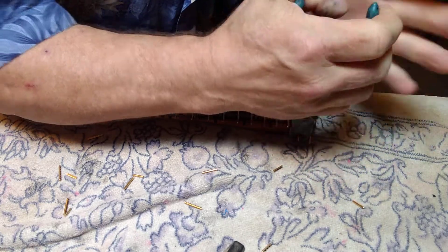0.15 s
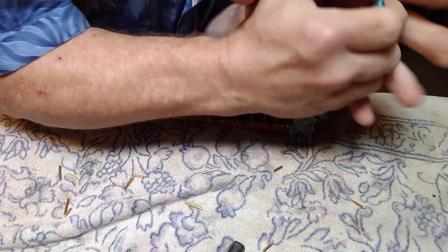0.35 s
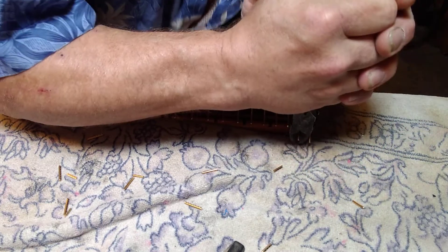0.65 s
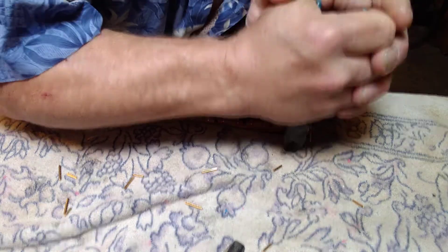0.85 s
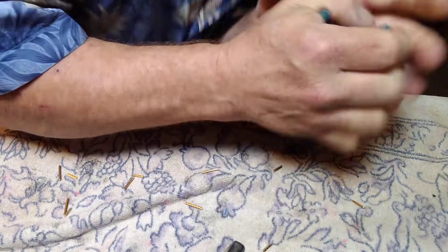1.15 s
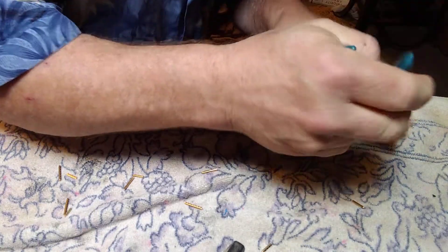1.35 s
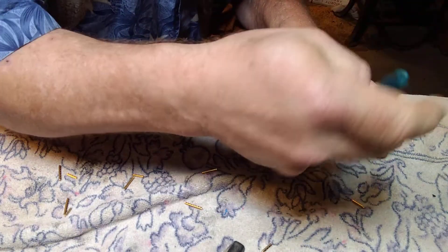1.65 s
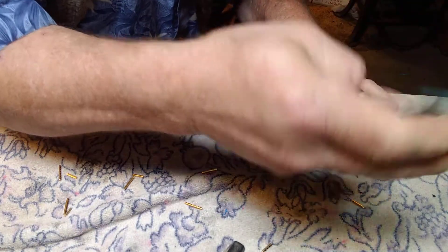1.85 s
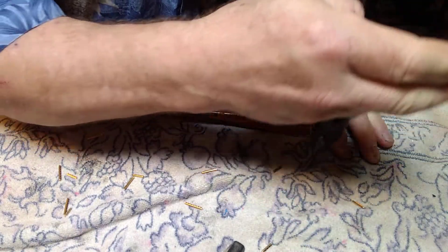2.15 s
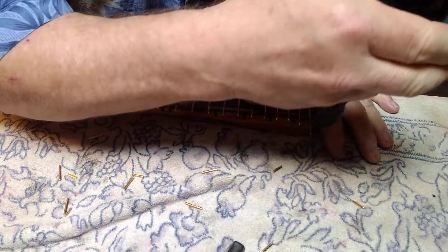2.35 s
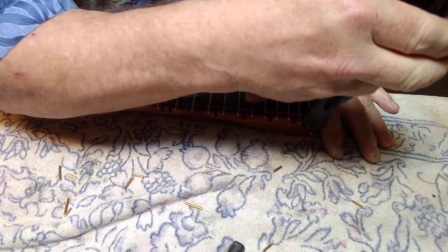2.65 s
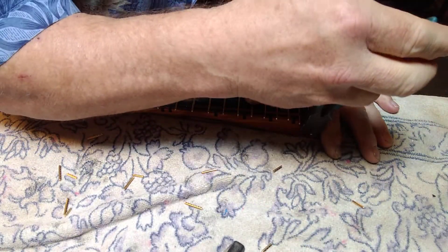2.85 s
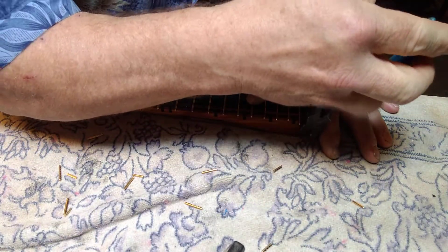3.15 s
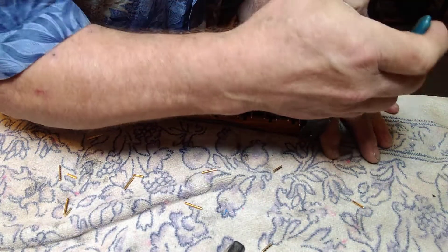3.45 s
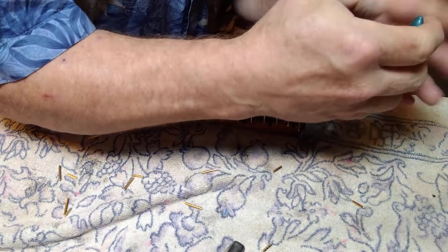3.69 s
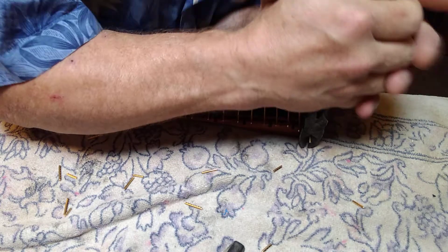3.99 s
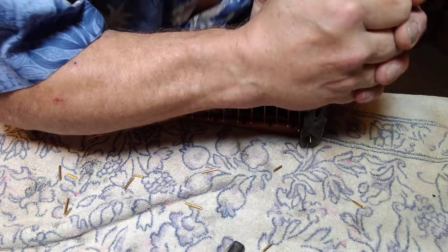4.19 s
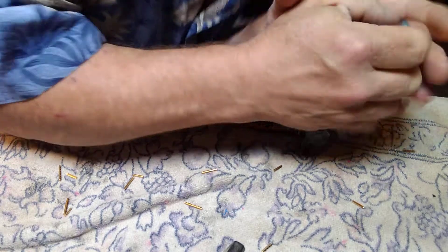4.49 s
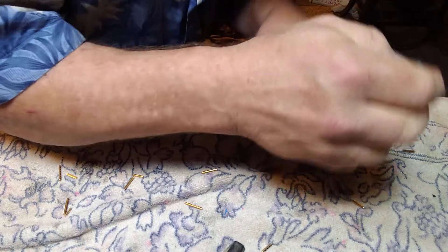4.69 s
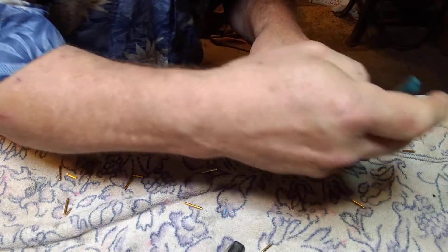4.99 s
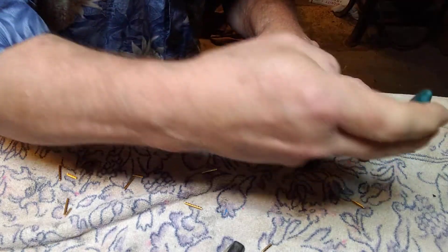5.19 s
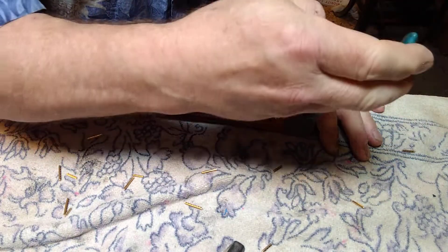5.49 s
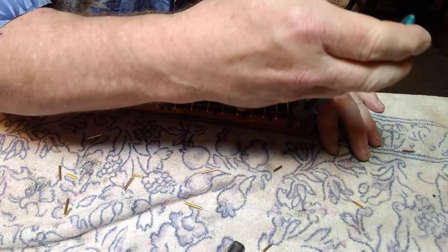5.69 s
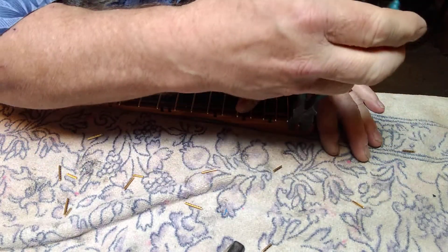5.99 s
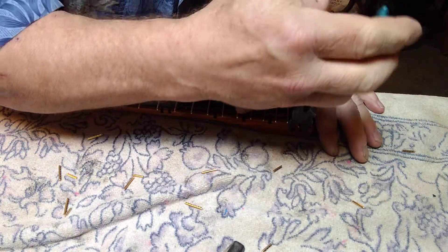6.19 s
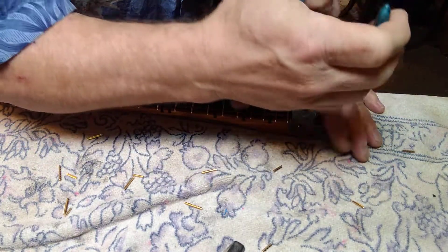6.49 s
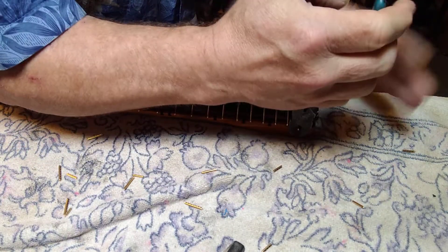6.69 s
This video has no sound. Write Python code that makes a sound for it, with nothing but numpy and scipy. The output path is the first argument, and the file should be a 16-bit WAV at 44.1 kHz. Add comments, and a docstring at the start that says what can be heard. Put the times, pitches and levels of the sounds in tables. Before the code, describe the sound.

A sharp metallic snap sounds up close as cutters bite off a wire end, which strikes nearby and lands with a light, tinny clatter. Small handling ticks and a soft wooden knock fill the pause. A second loud snap comes about three seconds after the first, jolting the microphone, and its offcut also bounces and rings briefly. Faint hum and hiss fill the small workshop.

```python
"""Cutting fret wire in a small workshop

End cutters snap through hard wire twice, close to a camera's stereo microphones. Each cut end
flies off, ticks, skitters and lands in something tinny further away; the jolt shakes the camera
mount. Behind the bench, a fan and mains hum beat softly over the room hiss."""
import sys
import numpy as np
from scipy import signal
from scipy.fft import rfft, irfft
from scipy.io import wavfile
from scipy.ndimage import uniform_filter1d

SR = 44100
rng = np.random.default_rng(int(sys.argv[2]) if len(sys.argv) > 2 else 0)


def to_wav(sig):
    """Store sig (one row per channel, or 1-D mono) as 16-bit WAV at the path in sys.argv[1].

    Samples outside -1..1 are clipped; the rate is SR.
    """
    pcm = np.clip(np.atleast_2d(sig), -1, 1) * 32767
    pcm = np.round(pcm).astype(np.int16)
    wavfile.write(sys.argv[1], SR, pcm.T)  # frames by channels


N = 301543

# Balance is left minus right; a send is the feed to the room, relative to the source's level.
# Sharp cracks: the wire snaps and its end strikes nearby; later a faint crack and the second snap.
# t/s, level/dB, balance/dB, t60/s, send/dB, relative blow/dB, air push/dB, steel ring/dB, spectrum index
SNAPS = [(0.7897, 8, 4.5, 0.011, -1, -12.5, -24.5, -25, 0), (0.8741, -1.5, 11, 0.015, -2, -16, -28, -42, 1),
         (4.1827, -25, 5.5, .03, -19, -9, -45, -61, 2),
         (4.1863, 2.5, 5.5, 0.021, -3.5, -14, -19.5, -20.5, 2)]
CRACK_SPECTRA = [
    [(88, -37.5), (150, 0.5), (275, -15.5), (348, -9.5), (624, -23.5), (716, -33.5), (1900, -14.5),
     (3490, -14), (4580, -4.5), (6770, -14.5), (8400, -3), (12400, -5.5), (14800, -8.5), (16000, -9)],
    [(88, -24), (150, -13.5), (649, -15), (2180, -22.5), (3920, -42.5), (4240, -49), (5250, -12.5),
     (7620, -21.5), (9440, -18.5), (10200, -1), (11000, 3.5), (16000, -18)],
    [(88, -28.5), (150, 0), (270, -8), (566, -7.5), (774, -22.5), (837, -20), (1900, -12.5), (2600, -11.5),
     (3620, -14.5), (4760, -2.5), (6510, -13), (7320, -6), (11700, -4.5), (16000, -9)],
]  # three colours of crack: f/Hz, relative density/dB
STEEL_MODES = [(4180, 230, -5.5), (4670, 400, 0), (5180, 300, -2), (5900, 350, -4)]  # the cutters' ring: f/Hz, width/Hz, relative level/dB
BITES = [(0.254, -61, 8900), (0.268, -54, 15300), (0.3595, -66, 10100), (0.3884, -65, 11600),
         (1.6783, -68.5, 10700), (3.6701, -67.5, 13900), (3.8631, -64, 9720), (3.8752, -65, 9560),
         (3.902, -56.5, 9820), (3.9209, -63.5, 12350), (3.935, -63.5, 5270), (3.9433, -59, 5380),
         (3.9577, -62, 5300), (3.9934, -64, 5340), (4.0122, -60.5, 6950), (4.029, -59.5, 12370),
         (4.0732, -60.5, 12200), (4.1153, -60, 12100), (6.5538, -68.5, 14280)]  # the jaws slip on the wire: t/s, level/dB, favoured f/Hz
JAW_MODES = [(5350, 76.5), (7100, 100), (8800, 100), (9750, 190), (10900, 200), (11600, 330), (12200, 290),
             (13300, 177), (14100, 208), (15200, 490)]  # resonances of the jaws: f/Hz, width/Hz
KNOCKS = [(2.612, -53, 4.5), (4.198, -30.5, -1), (5.601, -54.5, 4.5)]  # cutters set against the wooden neck: t/s, level/dB, balance/dB
NECK_MODES = [(223, -19, 0.13), (629, 5.5, 0.067), (978, -3, 0.04), (1435, -5.5, 0.03), (2550, -19, 0.058)]  # resonances of the neck: f/Hz, relative level/dB, t60/s
# Harder bounces in the tin, a list per landing: t/s, low ring/dB, then relative to the low ring
# middle/dB, chime/dB, treble/dB
BOUNCES = [
    [(1.418, -59.5, -5.5, -42.5, -2.5), (1.433, -39.5, -10, -44, -8), (1.465, -35, -11.5, -47, -13.5),
     (1.575, -58, -10, -40, -19), (1.635, -65, 2, -34, -20), (1.75, -61.5, -14, -30, -22)],
    [(4.797, -48, -11, -15, -2), (4.809, -37.5, -15, -35, -9), (4.824, -30.5, -13.5, -40, -12.5),
     (4.86, -50, -11, -11, -4), (4.91, -48, -10, -7, -9.5), (4.97, -51, -0.5, -1, -10),
     (5.06, -70, 7, 17, 4.5), (5.11, -64.5, 4.5, 5, -0.5)],
]
# Resonances of the tin: f/Hz, width/Hz, weight in first landing/dB, weight in second/dB
TIN_MODES = [(561, 143, -17, -21.5), (679, 73, -3.5, -7), (829, 37, -3, -5.5), (873, 63, 4.5, 5.5),
             (942, 27, -3.5, 1), (1288, 64, 7, 4), (1653, 23, -8, -13.5), (1770, 34, -19, -15),
             (1964, 200, -6.5, -9), (2347, 180, 0, -3.5), (2369, 35, -5, -10.5), (3038, 124, -29, -9),
             (3746, 150, -3.5, 0), (4360, 270, 4, 3), (4655, 250, 1.5, 0), (6220, 100, -9, -6),
             (6600, 350, -12, -6.5), (7650, 530, -6, -7), (8230, 570, -3.5, -5), (9000, 160, -2.5, -17),
             (9380, 460, -34, -1.5), (10680, 580, -27, 1), (11370, 460, -12, 5.5), (12200, 400, -12, -27),
             (13100, 550, -13, -8), (13900, 400, -17, -14)]
SKITTERS = [(1.075, -57.5, 0.14), (1.125, -63, .02), (4.453, -55, 0.055), (4.49, -62, .006)]  # a cut end skitters: loudest t/s, level/dB, swell/s
SKITTER_SPECTRUM = [(2350, -48), (4000, -93), (6550, -29), (7310, -19.5), (9440, -7), (10200, -15),
                    (11800, 1.5), (14500, -11.5), (16000, -26)]  # its hiss: f/Hz, relative density/dB
TICKS = [(1.4181, -48, 11700, 11, 4.5), (1.4621, -44, 11700, 18, 0), (1.4625, -49, 14270, 18, -6),
         (2.2576, -47.5, 12480, 20, -4), (2.612, -44.5, 12800, 10.5, -6.5), (2.258, -61, 9030, 14, -9.5),
         (2.613, -58.5, 8900, 9, -4.5), (2.6865, -49, 4970, -10.5, -4), (2.688, -65, 4350, -7, 8),
         (4.4303, -54, 11700, 11, -4), (4.485, -48, 11900, 20, -19.5), (4.4855, -52.5, 9260, 19, -17),
         (4.8012, -45, 10740, 9, 4), (4.8, -58, 14580, 11, -8), (6.2613, -45, 12800, 23, 1),
         (6.262, -58.5, 9930, 11.5, -4.5)]  # wire ends and jaws tick: t/s, level/dB, f/Hz, balance/dB, send/dB
TAPS = [(0.184, -60.5, 220, 19, 0), (0.185, -59, 718, 7, 0), (0.208, -57, 226, 13, 3.5),
        (0.212, -54.5, 722, 12, 0), (0.252, -62.5, 228, 24, -1.5), (0.252, -56, 776, 9, -3),
        (0.332, -63, 814.4, 8, -5), (0.399, -64, 725.2, 11, -2), (0.623, -62, 220, 12, -2.5),
        (0.612, -65, 1410, 6, -10), (1.561, -48, 353, -4, -1.5), (1.771, -57, 378, -18, -6.5),
        (1.859, -53.5, 360.6, -2.5, -3), (1.999, -60, 450.4, -4.5, -4), (2.65, -56.5, 230, 12, 7),
        (2.682, -56, 221.7, 8, 3), (2.729, -61.5, 362, -15, -9), (2.77, -61, 328.6, -10, -4),
        (3.278, -63.5, 421.4, -9, 2.5), (4.081, -60, 804, 7, -12.5), (5.091, -63.5, 455, 24, -9),
        (5.299, -62, 1297, 2.5, -3), (5.403, -63.5, 541, -12, -2.5), (5.462, -54, 784.6, -6.5, -9),
        (5.79, -63.5, 800, -9, -9), (5.971, -64, 638.4, 9.5, -7), (6.115, -49.5, 824, 5, -6),
        (6.228, -64, 402.6, -11.5, -4.5), (6.34, -66.5, 439.3, -12, 2)]  # dull taps about the bench: t/s, level/dB, f/Hz, balance/dB, send/dB
SQUEAKS = [(0.001, .065, 9270, -66), (.025, .022, 9900, -70), (0.066, .035, 9800, -65),
           (0.111, .04, 9500, -75), (0.427, .07, 9650, -67), (0.558, .045, 9400, -71),
           (0.607, .06, 9450, -71), (5.09, .1, 10900, -69)]  # thin squeaks, perhaps the hinge: t/s, length/s, f/Hz, level/dB
SHUDDERS = [
    [(0.782, -34.5, 18), (0.82, -32.5, 2), (0.862, -38.5, 5), (0.998, -39.5, 8), (1.064, -51, 16),
     (1.098, -41.5, 15), (1.136, -66.5, 16), (1.204, -56, 15), (1.25, -72.5, 10)],
    [(4.178, -32, 36.5), (4.198, -32.5, 20), (4.254, -50.5, 21), (4.318, -45, 26.5), (4.36, -48, 29),
     (4.4, -31.5, 1), (4.538, -58.5, 9), (4.62, -64, 9), (4.75, -70.5, 6)],
]  # the mount shakes, a curve per cut: t/s, level/dB, balance/dB
JOLTS = [(0.781, -55, -34.5, -34.5), (.87, -42.5, -46, -45), (4.178, -39.5, -40.5, -55),
         (4.385, -53, -42, -40), (4.699, -71, -68, -61)]  # loose parts shaken: t/s, overtone/dB, rumble/dB, sway/dB
FAN_ORDERS = [(1, -92, 0), (3, -77, -1), (5, -92, -1), (6, -81, 0)]  # shaft harmonics: order, rms level/dB, balance/dB
FAN_WHINES = [(62.3, 1.8, -79, 3.5), (400, 4.6, -94, -5.5), (458, 6.5, -89, -6), (542.2, 17, -88, 1.5),
              (804, 18, -89, 2), (2177, 5.8, -84.5, -14.5)]  # fuzzy fan tones: f/Hz, width/Hz, rms level/dB, balance/dB
ROOM_DECAY = [(150, 0.24), (400, 0.15), (1040, 0.24), (2760, 0.2), (5000, 0.15), (9000, 0.1), (15000, 0.14)]  # the workshop's early tail: f/Hz, t60/s
ROOM_COLOUR = [(100, -6.5), (400, -1.5), (1200, 1), (3000, -4), (5000, -2), (6800, 3), (9000, 3),
               (14000, -1)]  # tone of the tail: f/Hz, relative level/dB
HISS_SPECTRUM = [(12, -53), (20, -34.5), (63, -8), (86, -12), (111, 2.5), (143, -19.5), (224, -14),
                 (243, -21.5), (351, -16.5), (439, -20), (1080, -23.5), (2180, -21.5), (2960, -30.5),
                 (14300, -32.5), (16400, -48)]  # room tone: f/Hz, relative density/dB
MIC_LIKENESS = [(60, 0.45), (130, 0.93), (290, 0.82), (640, 0.6), (1410, -0.3), (3100, 0.41), (6820, -0.41),
                (15000, 0.094)]  # diffuse sound at the two microphones: f/Hz, correlation
MIC_BALANCE = [(60, 0.5), (180, 1.5), (550, 0.5), (1650, 0.5), (4970, -2), (15000, 8.5)]  # shading between the microphones: f/Hz, balance/dB


def snaps(dry, blow_hz=1700, blow_t60=.0097):
    """Close up, each snap or strike gives a crack and a blunt blow, and sets off its own room tail."""
    shading = pan(0.98, read(MIC_BALANCE, np.fft.rfftfreq(4096, 1 / SR)))
    lead = 128  # samples ahead of the click that excites the room
    for s, db, side_db, t60, send_db, blow_db, *_, kind in SNAPS:
        spectrum = CRACK_SPECTRA[round(kind)]
        crack = amp(db) * unit_rms(colour(rng.standard_normal((2, 4096)), spectrum))
        crack = pan(0.95, side_db)[:, None] * irfft(rfft(crack) * shading)
        blow = amp(db + blow_db) * unit_rms(resonate(rng.standard_normal(4096), blow_hz, width=2000))
        add(dry, s, crack * burst(t60) + blow * burst(blow_t60))
        click = colour(signal.unit_impulse(4096, lead), spectrum)
        strength = amp(db + send_db) * np.linalg.norm(burst(t60)) / np.linalg.norm(click)
        add(dry, s - lead / SR, room(strength * click))


def recoil(dry, push_s=.00095, push_lag_s=.002):
    """Each crack pushes the air once, near the left microphone, and leaves the steel ringing raggedly."""
    u = np.arange(1000) / SR / push_s
    push = np.e * u * (2 - u) * np.exp(-u)
    t = np.arange(SR // 4) / SR
    for s, *_, push_db, ring_db, _ in SNAPS:
        add(dry, s + push_lag_s, pan(amp(push_db) * push, 9.5))
        noise = rng.standard_normal((2, len(t))) * flicker(len(t), depth_db=2.2, span=130)
        ring = sum(amp(db) * mode(noise, hz, width) for hz, width, db in STEEL_MODES)
        add(dry, s, unit_rms(ring) * struck(t, [(0.012, ring_db)], rise=0.012, t60=.17))


def bites(dry, wet, others_db=-11, db_per_octave=-14, scrape_db=-10, send_db=-4, side_db=10):
    """Each slip scrapes and rings the jaws, favouring the mode nearest its pitch."""
    for s, db, hz in BITES:
        noise = rng.standard_normal((2, 4096))
        scatter_db = 5.5 * rng.standard_normal(len(JAW_MODES))
        mode_hz = np.transpose(JAW_MODES)[0]
        mode_db = others_db + db_per_octave * abs(np.log2(mode_hz / hz)) + scatter_db
        mode_db[np.argmin(abs(mode_hz - hz))] = 0
        ring = sum(gain * mode(noise, f, width) for gain, (f, width) in zip(amp(mode_db), JAW_MODES))
        scrape = unit_rms(np.diff(noise, prepend=0)) * burst(t60=0.032, rise=0.00031)
        bite = amp(db) * (ring * burst(t60=0.028, rise=0.0022) + amp(scrape_db) * scrape)
        add(dry, s, pan(1, side_db)[:, None] * bite)
        add(wet, s, amp(send_db) * bite[0])


def knocks(dry, wet, send_db=-4.5):
    """The cutters touch the neck and ring its damped wooden modes."""
    t = np.arange(8000) / SR
    body = sum(amp(db - 60 * t / t60) * np.sin(2 * np.pi * hz * t) for hz, db, t60 in NECK_MODES)
    for s, db, side_db in KNOCKS:
        add(dry, s, pan(amp(db) * body, side_db))
        add(wet, s, amp(db + send_db) * body)


def tin(dry, rattle_s=.55, left_lag_s=.00045):
    """Further off to the right, bounces and echoes too dense to count drive the modes of the tin."""
    for landing, rows in enumerate(BOUNCES):
        times, low_db, middle_db, chime_db, treble_db = np.transpose(rows)
        t = np.arange(times[0], times[0] + rattle_s, 1 / SR)
        noise = rng.standard_normal((5, len(t)))
        alike, apart = noise[0] + noise[1:3], noise[3:]  # half shared by the microphones; unshared
        # drive, from f/Hz, to f/Hz, level/dB, rise/s, t60/s
        bands = [(alike, 0, 1100, low_db, .0017, .36),
                 (alike, 1100, 2800, low_db + middle_db, .0017, .49),
                 (alike, 2800, 3300, low_db + chime_db, .02, .36),
                 (apart, 3300, SR, low_db + treble_db, .01, .27)]
        sound = 0
        for drive, lo, hi, levels, rise, t60 in bands:
            ring = sum(amp(db[landing]) * mode(drive, hz, width)
                       for hz, width, *db in TIN_MODES if lo <= hz < hi)
            sound += steadied(ring) * struck(t, zip(times, levels), rise, t60)
        add(dry[0], times[0] + left_lag_s, sound[0])
        add(dry[1], times[0], sound[1])


def skitters(dry, swell_db=16, fade_db_per_s=324, tail_s=.17, side_db=21.7):
    """Tiny bounces of a cut end, well to the left, merge into a grainy hiss that swells and fades."""
    for s, db, swell_s in SKITTERS:
        t = np.arange(-swell_s, tail_s, 1 / SR)
        arch_db = np.minimum(swell_db * t / swell_s, -fade_db_per_s * t)
        level = signal.windows.tukey(len(t), .05) * amp(db + arch_db)
        grains = rng.standard_normal((2, len(t))) * flicker(len(t), depth_db=1.6, span=90)
        add(dry, s - swell_s, pan(level, side_db) * unit_rms(colour(grains, SKITTER_SPECTRUM)))


def contacts(dry, wet, rows, width, rise, t60):
    """A tick or tap at the bench: noise rings one broad resonance; width maps pitch to Hz per stage."""
    for s, db, hz, side_db, send_db in rows:
        ring = rng.standard_normal((2, 4096))
        for widening in (1, 1, 2):
            ring = resonate(ring, hz, widening * width(hz))
        ping = amp(db) * unit_rms(ring) * burst(t60, rise)
        add(dry, s, pan(1, side_db)[:, None] * ping)
        add(wet, s, amp(send_db) * ping[0])


def squeaks(dry, sag_db=-6):
    """A narrow, unsteady whistle with a weaker one just below; it starts softly and its level sags."""
    for s, length, hz, db in SQUEAKS:
        t = np.arange(0, length, 1 / SR)
        level = signal.windows.tukey(len(t), .13) * amp(db + sag_db * t / length)
        noise = rng.standard_normal((2, len(t)))
        whistle = resonate(noise, hz, width=80) + 0.22 * resonate(noise, 0.95 * hz, width=90)
        add(dry, s, level * unit_rms(whistle))


def shudders(dry, start_hz=101.1, glide_hz_per_s=30):
    """A low shudder fades, gliding up toward the hum's pitch; its phase drifts at each microphone."""
    for rows in SHUDDERS:
        times, levels, balances = np.transpose(rows)
        t = np.arange(times[0], times[-1], 1 / SR)
        level = pan(amp(np.interp(t, times, levels)), np.interp(t, times, balances))
        hz = start_hz + glide_hz_per_s * (t - times[0])
        drift = 0.059 * np.cumsum(uniform_filter1d(rng.standard_normal((2, len(t))), 900), 1)
        tone = np.sqrt(2) * np.sin(2 * np.pi * np.cumsum(hz) / SR + drift)
        add(dry, times[0], signal.windows.tukey(len(t), .05) * level * tone)


def jolts(dry):
    """Each jolt shakes loose parts, leaving an overtone, a rumble and a slow sway dying away."""
    t = np.arange(SR // 2) / SR
    parts = (204, 37, .8), (60, 25, .45), (22, 18, .4)  # f/Hz, width/Hz, t60/s
    for s, *levels in JOLTS:
        noise = rng.standard_normal((3, len(t)))
        drive = (noise[0] + 1.1 * noise[1:]) * pan(1, 3)[:, None]
        for (hz, width, t60), db in zip(parts, levels):
            add(dry, s, mode(drive, hz, width) * struck(t, [(0.0042, db)], rise=0.015, t60=t60))


def fan_and_mains(shaft_hz=36.33, mains_hz=119.935, mains_db=-74, in_phase_s=2.012):
    """Behind the bench, mains hum beats against a fan's third shaft order; fuzzy fan tones waver."""
    t = np.arange(N) / SR - in_phase_s
    fan = sum(pan(amp(db) * np.cos(2 * np.pi * order * shaft_hz * t), side_db)
              for order, db, side_db in FAN_ORDERS)
    mains = amp(mains_db) * np.cos(2 * np.pi * mains_hz * t)
    noise = rng.standard_normal(N) * flicker(N, depth_db=3.4, span=1500)
    whines = sum(pan(amp(db) * unit_rms(resonate(noise, hz, width)), side_db)
                 for hz, width, db, side_db in FAN_WHINES)
    return np.sqrt(2) * (fan + mains) + whines


def room(x, gap_s=.002, build_s=.0027, hold_s=.052, late_db=-22, late_stretch=3.9):
    """A diffuse tail builds, holds and falls; a weaker, slower one returns from the shop's far end."""
    hz, spectra = diffuse_pair(frames=420, size=256)
    t = np.arange(420) * 64 / SR
    fall_db = -60 * (np.hypot(t, hold_s) - hold_s) / read(ROOM_DECAY, hz)[:, None]
    decay = amp(fall_db) + amp(late_db + fall_db / late_stretch)
    spectra = spectra * amp(read(ROOM_COLOUR, hz))[:, None] * decay
    tail = signal.istft(spectra, nperseg=256, noverlap=192)[1]
    since_gap = np.maximum(np.arange(tail.shape[1]) / SR - gap_s, 0)
    tail *= 1 - np.exp(-since_gap / build_s)
    return signal.fftconvolve(x[None], tail / np.linalg.norm(tail) * np.sqrt(2), axes=1)[:, :N]


def hiss(rms_db=-72.5, patch_db=1.9):
    """Room tone from all around, drifting slightly in patches of time and frequency."""
    hz, spectra = diffuse_pair(frames=N // 256 + 5, size=1024)
    patches = rng.standard_normal((spectra.shape[2], len(hz))).T
    patches = unit_rms(uniform_filter1d(uniform_filter1d(patches, 8, axis=0), 12, axis=1))
    spectra = spectra * amp(read(HISS_SPECTRUM, hz)[:, None] + patch_db * patches)
    return amp(rms_db) * unit_rms(signal.istft(spectra, nperseg=1024, noverlap=768)[1][:, :N])


def diffuse_pair(frames, size):
    """Random short-time spectra at the two microphones, alike in the bass."""
    hz = np.fft.rfftfreq(size, 1 / SR)
    a, b, c, d = rng.standard_normal((frames, len(hz), 4)).T
    likeness = read(MIC_LIKENESS, hz)[:, None]
    left = a + 1j * b
    right = likeness * left + np.sqrt(1 - likeness ** 2) * (c + 1j * d)
    return hz, np.array([left, right]) * pan(1, read(MIC_BALANCE, hz))[..., None]


def amp(db):
    return 10 ** (np.asarray(db) / 20)


def unit_rms(x):
    return x / np.sqrt(np.mean(x ** 2) + 1e-20)


def read(points, hz):
    """A curve's value at hz, on a logarithmic frequency axis."""
    f, value = np.transpose(points)
    return np.interp(np.log(hz + 1), np.log(f + 1), value)


def pan(x, db):
    """Stereo pair with the left microphone db above the right."""
    return np.array([x * amp(db / 2), x * amp(-db / 2)])


def add(mix, s, sound):
    part = mix[..., round(s * SR):][..., :sound.shape[-1]]
    part += sound[..., :part.shape[-1]]


def colour(x, points):
    """Filters by a curve of f/Hz, gain/dB."""
    gain = amp(read(points, np.fft.rfftfreq(x.shape[-1], 1 / SR)))
    return irfft(rfft(x) * gain, x.shape[-1])


def resonate(x, hz, width):
    """Shifts hz down to zero, smooths, shifts back: a resonance width Hz wide."""
    turn = np.exp(2j * np.pi * np.cumsum(np.full(x.shape[-1], hz)) / SR)
    pole = np.exp(-np.pi * width / SR)
    return 2 * (turn * signal.lfilter([1 - pole], [1, -pole], x / turn)).real


def mode(drive, hz, width):
    """A driven mode at unit rms: two resonances in series, each width Hz wide."""
    return unit_rms(resonate(resonate(drive, hz, width), hz, width))


def flicker(length, depth_db, span):
    """A random gain, smoothed over span samples."""
    return amp(depth_db * unit_rms(uniform_filter1d(rng.standard_normal(length), span)))


def steadied(x, span_s=0.026):
    """Levels out slow swells, keeps the quick beating."""
    power = uniform_filter1d((x ** 2).mean(0), round(span_s * SR))
    return x / np.sqrt(abs(power) + 1e-12)


def burst(t60, rise=0.00055):
    """Envelope of one short contact; times in seconds."""
    t = np.arange(4096) / SR
    return (1 - np.exp(-t / rise)) * amp(-60 * t / t60)


def struck(t, hits, rise, t60):
    """Envelope of a ring struck at hits of t/s, level/dB: each rises and dies, and their powers add."""
    power = 0
    for s, db in hits:
        since = np.maximum(t - s, 0)
        power += ((1 - np.exp(-since / rise)) * amp(db - 60 * since / t60)) ** 2
    return np.sqrt(power)


def scene():
    """The bench at the microphones: direct sound over the background, plus the workshop's tail."""
    dry, wet = hiss() + fan_and_mains(), np.zeros(N)
    bites(dry, wet)
    contacts(dry, wet, TICKS, width=lambda hz: 0.13 * hz, rise=.0011, t60=.034)
    contacts(dry, wet, TAPS, width=lambda hz: 80, rise=.006, t60=.12)
    knocks(dry, wet)
    for source in (snaps, recoil, tin, skitters, squeaks, shudders, jolts):
        source(dry)
    return dry + room(wet)


def record(dry):
    """The loudest cracks are clipped at their peaks; the top treble then steps down and cuts off."""
    ceiling, shelf_hz, shelf_db, edge_hz = .74, 15600, -20, 16550
    to_edge = signal.firwin(511, edge_hz, window=("kaiser", 9), fs=SR)
    to_shelf = signal.firwin(511, shelf_hz, window=("kaiser", 9), fs=SR)
    taps = amp(shelf_db) * to_edge + (1 - amp(shelf_db)) * to_shelf
    return signal.oaconvolve(np.clip(dry, -ceiling, ceiling), taps[None], "same")


dry = scene()
out = record(dry)
to_wav(out)
```